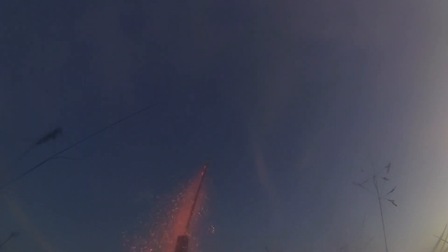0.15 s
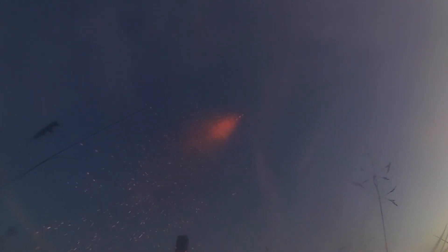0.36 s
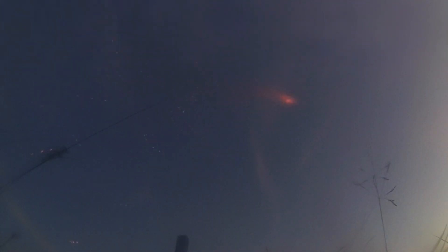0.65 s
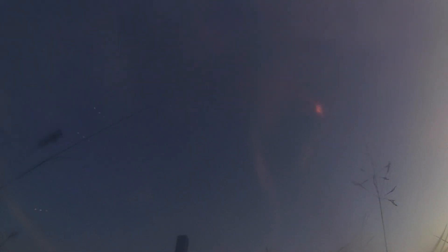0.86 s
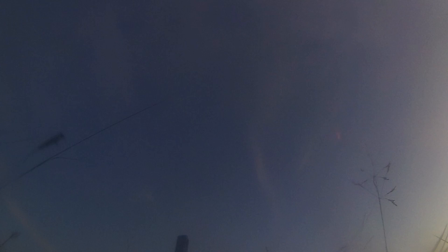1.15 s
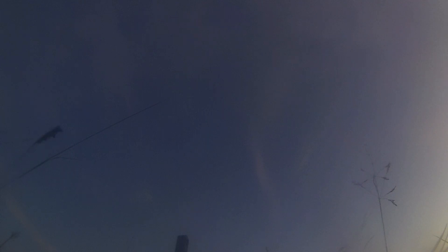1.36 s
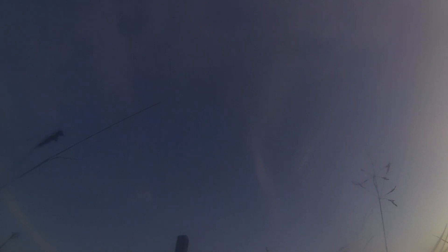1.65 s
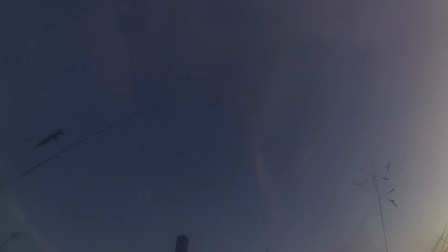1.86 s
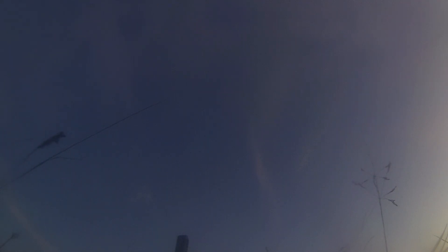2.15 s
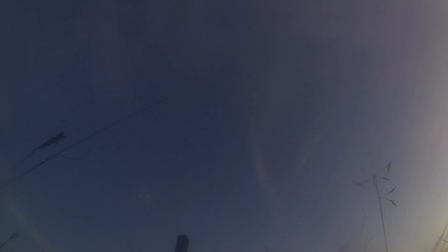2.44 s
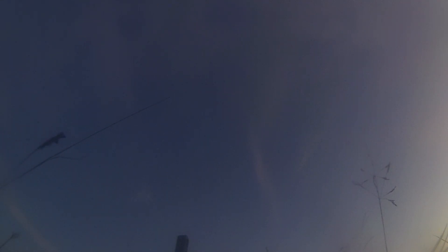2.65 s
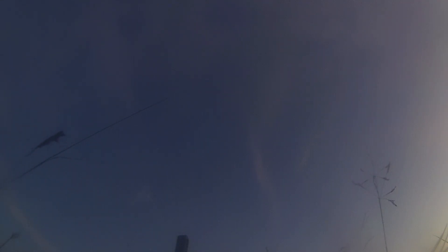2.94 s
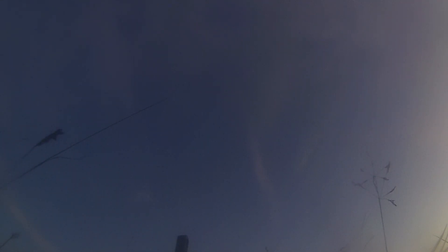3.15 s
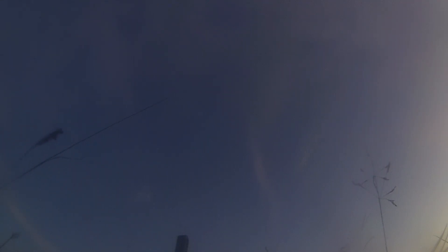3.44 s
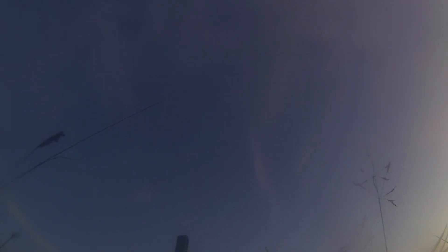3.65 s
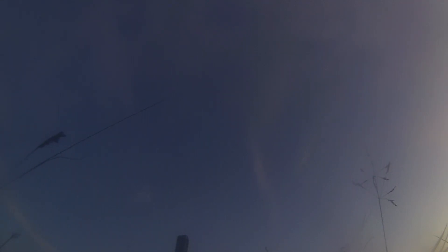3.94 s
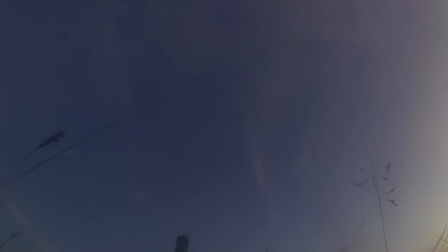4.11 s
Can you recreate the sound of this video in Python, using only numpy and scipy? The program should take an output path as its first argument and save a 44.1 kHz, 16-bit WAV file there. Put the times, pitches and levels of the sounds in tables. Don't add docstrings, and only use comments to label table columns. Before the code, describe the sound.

Rushing, crackly whoosh of a little rocket leaving its tube, thinning away within about a second, then soft low wind thumps over faint electronic noise.

```python
import sys
import numpy as np
from scipy import signal
from scipy.io import wavfile
from scipy.ndimage import uniform_filter1d

SR = 44100
rng = np.random.default_rng(int(sys.argv[2]) if len(sys.argv) > 2 else 0)


def attenuation_scalar(level_db):
    decades = np.asarray(level_db, float) / 20
    return 10 ** decades


def master(y):
    cut = np.clip(np.atleast_2d(y).T, -1, 1)
    pcm = np.round(cut * 32767)
    wavfile.write(sys.argv[1], SR, pcm.astype(np.int16))


N = 188643
SIZE, HOP = 1024, 256
HZ = np.fft.rfftfreq(SIZE, 1 / SR)

# time in seconds, roar in dB, aim of the nozzle at the ports as fizz over
# roar in dB.
BURN = [(0, -26.5, -1), (.18, -21.5, -.5), (.38, -22, 2), (.5, -25.5, 3), (.68, -26, 5), (.85, -32.5, 3),
        (1.0, -41.5, 11), (1.19, -43.5, 3), (1.4, -45, 10), (1.7, -47.5, 7), (2.1, -53, 8), (2.42, -53, 8),
        (2.55, -57.5, 3), (3.15, -60.5, 4.5), (3.47, -50, -5), (3.7, -59, 2), (4.14, -52.5, -9),
        (4.28, -57, -2)]
# time in seconds, half length in seconds, extra aim in dB,
# extra roar in dB, extra hiss in dB.
NOZZLE_SWINGS = [(.25, .18, 0, 0, -2.3), (.51, .04, 0, .5, 2.5), (.6, .06, 3.5, 1, -1),
                 (.9, .12, 0, 0, -2.5), (1.5, .08, 2.5, 0, 0), (1.9, .15, 2, 0, 0), (2.39, .05, 6, -1, 0),
                 (2.46, .04, -5, 4.5, 1), (2.72, .1, -2.5, 3.5, 0), (2.87, .05, 1, 1.5, 0),
                 (3.05, .04, 3, 0, -1), (3.17, .04, 8, -.5, -2), (3.32, .06, -1, 1, 0),
                 (3.4, .05, 4, -1, 0), (3.48, .04, 0, 0, 3), (3.57, .05, -1.5, 0, -3),
                 (3.78, .05, 2.5, -2.5, 1), (4.02, .05, 4.5, 1, 0), (4.12, .2, 0, 0, 3.5),
                 (4.22, .04, 6, 2.5, -1)]
# time in seconds, half length in seconds, extra bass in dB.
BLAST_THUMPS = [
    (.2, .04, 6),
    (.37, .12, -15),
    (.64, .07, 20),
    (.87, .17, -8),
]
# frequency in Hz, level in dB per Hz.
JET_COLOUR = [(71, -27), (120, -6.5), (277, -12), (333, -11.5), (500, -10.5), (601, -13), (652, -13),
              (1160, -10), (1600, -10), (2260, -12), (3480, -2), (5230, -6.5), (10200, 5.5), (13100, -11),
              (15700, -17.5)]
PART_EDGES_HZ = [800, 2500, 6500]
PART_BLENDS_HZ = [520, 1100, 1900, 3200, 4300, 8200]
# time in seconds, lag of the inverted mouth echo in ms, strength 0-1.
TUBE_ECHO = [(0, 2.6, 0), (.1, 2.4, .87), (.22, 1.97, .23), (.42, 1.75, .1), (.54, 2.1, .03),
             (.72, 2.5, .15), (1.05, 2.3, 0)]
# time in seconds, ground echo lag in ms, echo strength 0-1.
FLIGHT_ECHO = [(0, .18, .8), (.24, .32, .7), (.38, .54, .7), (.5, .785, .95), (.7, 1.29, .7),
               (.9, 1.78, .7), (1.2, 2.25, .7), (1.4, 2.53, .75), (1.6, 2.56, .75), (2.01, 2.41, .8),
               (2.4, 2.28, .65), (3.1, 1.9, .5), (3.4, 1.68, .85), (3.8, 1.43, .65), (4.01, 1.25, .9),
               (4.3, 1.05, .9)]
# frequency in Hz, reflection 0-1, phase in radians.
GRASS_REFLECTION = [(200, .95, .3), (1000, .9, .6), (3000, .6, .8), (6000, .35, .9), (12000, .08, .9)]
# time in seconds, half length in seconds, extra power on the reflection.
GROUND_STRETCHES = [
    (.15, .2, -.35),
    (.49, .09, -.75),
    (1.2, .55, 1.4),
]
# frequency in Hz, left-right likeness 0-1, left lead in radians, left minus right
# in dB.
PORT_RESPONSE = [(100, 0.97, -0.1, 0.0), (300, 0.86, -0.12, -0.35), (600, 0.7, -0.16, -2.43),
                 (1400, 0.95, 0.09, -1.11), (2200, 0.75, 0.26, -1.41), (3200, 0.86, 0.02, -1.62),
                 (4500, 0.76, 0.41, -1.92), (6000, 0.73, 0.47, -3.65), (7500, 0.75, 1.09, -4.77),
                 (9000, 0.78, 1.59, 1.27), (10500, 0.75, 1.36, 6.49), (12000, 0.62, 0.66, 3.82),
                 (15000, 0.51, 1.18, -0.29)]
# time in seconds, peak in dB, seconds per 10 dB of rise and fall, brightening in dB per octave.
PRESSURE_GUSTS = [(0, -52, .07, -1), (.1, -45, .035, 5), (.3, -43, .08, 7), (.38, -39, .1, 10),
                  (.54, -45, .1, 8), (.65, -41, .07, 10), (.88, -52, .1, 9), (1.06, -36.5, .065, 2),
                  (1.14, -48, .08, -4), (1.29, -51, .2, 1.5), (1.42, -46, .07, 3), (1.5, -40, .05, 2),
                  (1.56, -36, .03, -1.5), (1.78, -48, .04, 4), (1.87, -45, .08, 2), (2.22, -49, .08, 5),
                  (2.27, -36, .03, -1), (2.44, -49, .045, -1), (2.62, -38.5, .045, -1.5), (2.79, -52, .15, 4),
                  (3.2, -50, .12, 3), (3.66, -58, .2, 11), (3.79, -51, .12, 4), (3.9, -46, .12, 1.5),
                  (4.0, -42.5, .06, 0), (4.12, -43.5, .04, 3), (4.2, -43, .12, 3.5)]
# frequency in Hz, level in dB per Hz.
WIND_COLOUR = [(8.8, -34), (15, -2), (32, 4.5), (76, -2.5), (108, -14.5), (199, -26), (237, -25.5),
               (400, -37), (520, -77), (880, -120)]
# time in seconds, peak in dB, width in ms, push 1 or pull -1.
WIND_BUFFETS = [(1.042, -43, 12, 1), (1.065, -24, 2.65, 1), (1.101, -36, 4.8, 1), (1.345, -33, 2.5, 1),
                (1.482, -37, 4.2, -1), (1.514, -30.5, 2.5, -1), (1.542, -31.5, 1.7, -1),
                (1.564, -33, 4.8, 1), (1.772, -37, 6.8, -1), (1.869, -38.5, 4, -1), (2.209, -36, 5.5, 1),
                (2.266, -33, 6.0, -1), (2.618, -35.5, 6.1, -1), (2.643, -37, 4.8, -1),
                (3.955, -32, 6.1, -1), (4.009, -42, 11, 1), (4.115, -39, 5, -1), (4.165, -39, 3.5, -1),
                (4.197, -42, 5.2, -1), (4.234, -40, 6.4, -1), (4.253, -40, 9, 1)]
# time in seconds, length in seconds, pitch in Hz, level in dB.
WIND_MOANS = [
    (2.11, 0.074, 251, -57.5),
    (2.33, 0.025, 251, -58),
    (3.027, 0.12, 232.7, -58),
]
# frequency in Hz, level in dB.
CIRCUIT_WHINE = [(13028, -84), (13109, -83), (15479, -92)]
# frequency in Hz, level in dB per Hz.
HISS_COLOUR = [(120, -4), (300, 2), (900, -2), (2200, -16), (5200, -13), (10000, -5), (12000, -31),
               (14000, -6), (16500, -17)]


def rocket():
    sputter = attenuation_scalar(1.43 * drift(0.00065) + 1.01 * drift(0.0075) + 0.41 * drift(0.029))
    t, (direct, scattered, patches) = spectra(rng.standard_normal((3, N)) * evened(sputter))
    patches = uniform_filter1d(patches.real, 14, 0)
    patches = evened(uniform_filter1d(patches, 10, 1))
    ring_db, steady_ring_db = tube_ring(t)
    hz = HZ[:, None]
    ring_band = np.exp(-((hz - 1590) / 540) ** 4)
    bass_band = 1 / (1 + (hz / 270) ** 4)
    bass_db = -6 + bumps(BLAST_THUMPS, t)[0]
    colour_db = read(JET_COLOUR)[0] + ring_db * ring_band + bass_db * bass_band + 2.93 * patches
    colour = attenuation_scalar(colour_db) * ground_comb(t, patches) * tube_comb(t)
    colour = balance_parts(colour, t, steady_ring_db)
    return 0.0 + at_ports(t, colour, direct, scattered) * attenuation_scalar(0.88)


def tube_ring(t):
    steady_db = 14 * np.exp(-t / .17)
    left_db = 2.1
    frame_samples = np.minimum((t * SR).astype(int), N - 1)
    flutter = 1 + 0.48 * drift(0.024)[frame_samples]
    return (steady_db + left_db) * flutter, steady_db


def tube_comb(t):
    lag_ms, strength = follow(TUBE_ECHO, t)
    reflection = read(GRASS_REFLECTION)[0]
    turn = np.exp(-2j * np.pi * HZ[:, None] * lag_ms / 1000)
    return 1 - np.clip(strength, 0, .9) * reflection * turn


def ground_comb(t, patches):
    hz = HZ[:, None]
    lag_ms, echo = follow(FLIGHT_ECHO, t)
    reflection, phase = read(GRASS_REFLECTION)
    grazing = 2.2 * np.exp(-(lag_ms / .46) ** 4.5)
    dulling = 1.05 + bumps(GROUND_STRETCHES, t)[0]
    scatter_hz = 900 * np.exp(-(lag_ms / .9) ** 4)
    echo = echo * hz / (hz + scatter_hz + 1)
    echo = .85 * echo * (1 + .3 * patches[::-1])
    strength = np.clip(echo * np.clip(reflection, .01, 1) ** dulling, 0, .98)
    return 1 + strength * np.exp(-1j * (2 * np.pi * hz * lag_ms / 1000 + phase + grazing))


def balance_parts(colour, t, steady_ring_db):
    aim_swing_db, surge_db, spit_db = bumps(NOZZLE_SWINGS, t)
    roar_db, aim_db = follow(BURN, t)
    roar_db = roar_db + surge_db
    aim_db = aim_db + aim_swing_db
    hiss_db = roar_db - 1.7 + spit_db + .45 * aim_db - .35 * steady_ring_db
    rumble_db = -35 + .24 * roar_db - 13 * np.log10(1 + (t / .7) ** 2)
    band = np.searchsorted(PART_EDGES_HZ, HZ)
    levels = []
    for k, db in enumerate([rumble_db, roar_db, hiss_db, roar_db + aim_db]):
        inside = (band == k) & (HZ > 200)
        power = (abs(colour[inside]) ** 2).sum(0) / len(HZ)
        levels.append(db - 10 * np.log10(power))
    part = np.interp(np.log(HZ + 1), np.log(PART_BLENDS_HZ), [0, 1, 1, 2, 2, 3])[:, None]
    share = np.maximum(1 - abs(part - np.arange(len(levels))), 0)
    return colour * attenuation_scalar(share @ levels)


def at_ports(t, colour, direct, scattered):
    bearing = .55 + .8 * (1 - np.exp(-(t / 1.2) ** 2))
    likeness = .9 + .3 * np.exp(-t / .8)
    same, lead, balance_db = read(PORT_RESPONSE)
    same = np.clip(same ** .85 * likeness, 0, .995)
    shared = same * direct * np.exp(-1j * lead * bearing)
    right = shared + np.sqrt(1 - same ** 2) * scattered
    pair = np.array([direct * attenuation_scalar(balance_db / 2), right * attenuation_scalar(-balance_db / 2)])
    return waves(colour * pair)


def wind():
    t = np.arange(N) / SR
    frames, z = spectra(rng.standard_normal((2, N)))
    gust_db, brightening = gusting(frames)
    octaves = np.log2(np.clip(HZ[:, None], 20, 300) / 60)
    colour = evened(attenuation_scalar(read(WIND_COLOUR)[0] + octaves * brightening), 0)
    lumps = evened(waves(z * colour), 1)
    lumps = lumps * evened(attenuation_scalar(2.0 * drift(0.0115)))
    lumps = lumps * attenuation_scalar(np.interp(t, frames, gust_db) - 1.5)
    blows = buffets(t) + moans(t)
    apart = 0.12 * lumps[1] + 0.27 * (np.roll(blows, 60) - np.roll(blows, -60))
    return lumps[0] + blows + np.array([apart, -apart])


def gusting(t):
    s, db, span, brightening = np.transpose(PRESSURE_GUSTS)[:, :, None]
    power = attenuation_scalar(2 * db - 20 * abs(t - s) / span)
    calm = attenuation_scalar(2 * -56.5)
    total = power.sum(0) + calm
    return 10 * np.log10(total), ((power * brightening).sum(0) + calm * 5) / total


def buffets(t):
    blows = np.zeros(N)
    for s, db, width_ms, push in WIND_BUFFETS:
        u = (t - s) / (0.87 * width_ms / 1000)
        blows += np.sign(push) * attenuation_scalar(db) * (1 - u ** 2) * np.exp(-u ** 2 / 2)
    return blows


def moans(t):
    tones = np.zeros(N)
    for s, length, hz, db in WIND_MOANS:
        swell = np.exp(-((t - s) / length * 2) ** 2)
        tones += np.sqrt(2) * attenuation_scalar(db) * swell * np.sin(2 * np.pi * hz * t)
    return tones


def floor():
    t = np.arange(N) / SR
    z = spectra(rng.standard_normal((2, N)))[1]
    hiss = evened(waves(z * attenuation_scalar(read(HISS_COLOUR)[0])))
    whine = np.zeros(N)
    for hz, db in CIRCUIT_WHINE:
        whine += np.sqrt(2) * attenuation_scalar(db + 2.5 * drift(.05)) * np.sin(2 * np.pi * hz * t)
    return attenuation_scalar(-64) * hiss + whine


def evened(x, axis=None):
    return x / np.sqrt(np.mean(abs(x) ** 2, axis, keepdims=True) + 1e-20)


def drift(seconds):
    span = max(int(seconds * SR), 2)
    smooth = uniform_filter1d(rng.standard_normal(N), span)
    return evened(uniform_filter1d(smooth, span))


def bumps(rows, t):
    s, half, *columns = np.transpose(rows)
    return np.array(columns) @ np.exp(-((t - s[:, None]) / half[:, None]) ** 2)


def read(points):
    f, *columns = np.transpose(points)
    return [np.interp(np.log(HZ + 1), np.log(f + 1), c)[:, None] for c in columns]


def follow(rows, t):
    s, *columns = np.transpose(rows)
    return [np.interp(t, s, c) for c in columns]


def spectra(x):
    return signal.stft(x, SR, nperseg=SIZE, noverlap=SIZE - HOP)[1:]


def waves(z):
    return signal.istft(z, SR, nperseg=SIZE, noverlap=SIZE - HOP)[1][..., :N]


def scene():
    return rocket() + wind() + floor()


def low_pass(x):
    return signal.sosfilt(signal.butter(12, 15880, fs=SR, output="sos"), x)


def record(dry):
    return low_pass(dry)


dry = scene()
out = record(dry)
master(out)
```